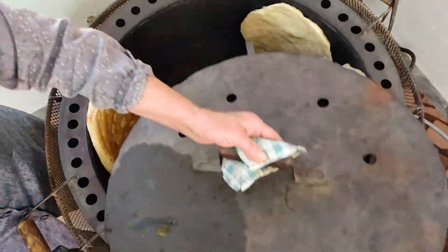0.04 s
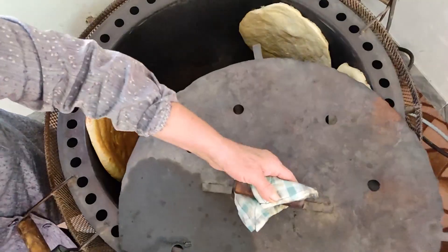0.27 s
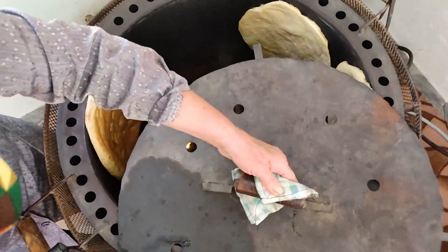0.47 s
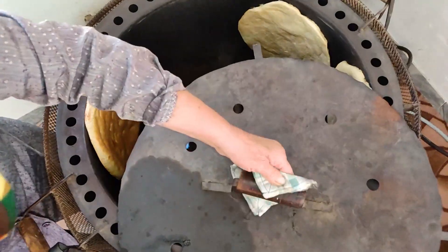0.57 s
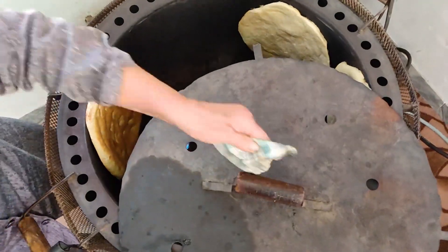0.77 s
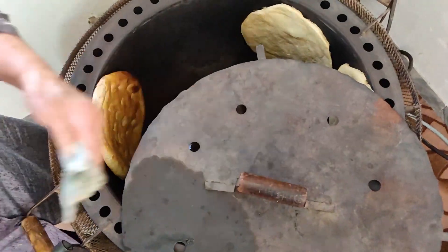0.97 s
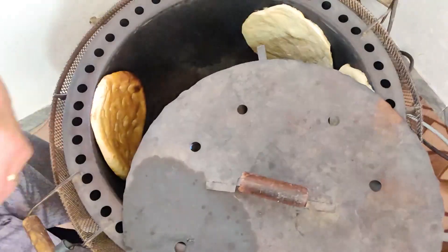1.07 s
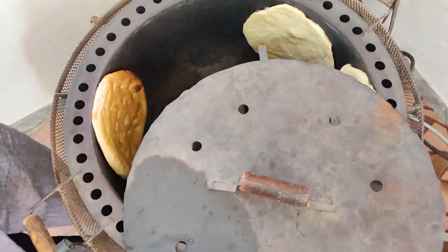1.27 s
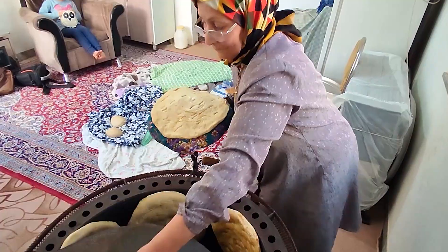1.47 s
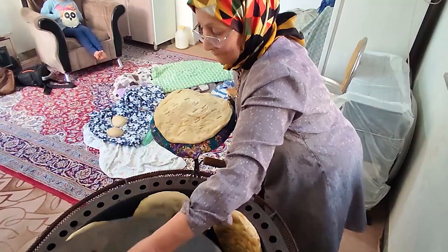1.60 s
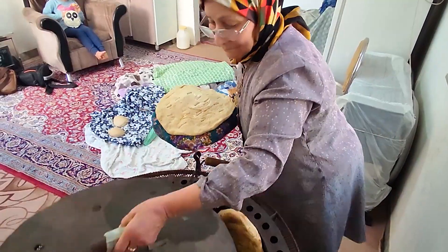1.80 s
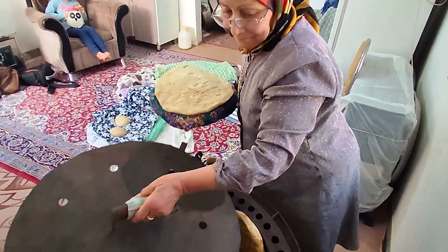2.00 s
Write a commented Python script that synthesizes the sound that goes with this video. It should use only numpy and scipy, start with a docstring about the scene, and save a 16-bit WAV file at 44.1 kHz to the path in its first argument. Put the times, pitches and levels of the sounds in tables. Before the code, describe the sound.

A heavy metal lid clanks down on a hollow drum oven close by, ringing and rocking to rest. Then, heard from farther back in the room, it scrapes off over the rim. A gas burner hisses throughout.

```python
"""A heavy sheet-metal lid is set on a drum oven, close to a stereo microphone.
It lands with a click and a short low tone, clanks and groans over the rim, and rocks to rest. The
clanks ring the lid's modes, the hollow drum booms under the weight, and a gas burner hisses throughout.
From 1.4 s the microphone is mono and farther back in the room: the lid is dragged off again,
scraping over the rim while the hand damps its ring."""
import sys
import numpy as np
from scipy import signal
from scipy.io import wavfile
from scipy.ndimage import uniform_filter1d

SR = 44100
rng = np.random.default_rng(int(sys.argv[2]) if len(sys.argv) > 2 else 0)


def to_wav(sig):
    """Store sig (one row per channel, or 1-D mono) as 16-bit WAV at the path in sys.argv[1].

    Samples outside -1..1 are clipped; the rate is SR.
    """
    pcm = np.clip(np.atleast_2d(sig), -1, 1) * 32767
    pcm = np.round(pcm).astype(np.int16)
    wavfile.write(sys.argv[1], SR, pcm.T)  # frames by channels


N = 90404
T = np.arange(N) / SR

# the lid's clearest modes: f/Hz, relative level/dB
LID_MODES = [(181, 1), (356, 6), (402, 3), (577, 5.5), (597, 1), (648, 3), (708, 2.5), (850, -1),
             (914, 2.5), (1016, -1.5), (1048, 0.5), (1497, -9), (1835, -8)]


def amp(db):
    """Decibels to gain."""
    return 10 ** (np.asarray(db) / 20)


def unit(x):
    """Scales to rms 1."""
    return x / np.sqrt(np.mean(x ** 2) + 1e-20)


def read(points, hz):
    """Reads a table on a log-frequency axis."""
    f, value = np.transpose(points)
    return np.interp(np.log(hz + 1), np.log(f + 1), value)


def colour(x, db_at, size=4096):
    """Causal filter whose gain in dB is a function of frequency."""
    log_gain = np.log(amp(db_at(abs(np.fft.fftfreq(size, 1 / SR)))))
    taps = np.fft.ifft(np.exp(np.conj(signal.hilbert(log_gain)))).real[:size // 2]
    return signal.fftconvolve(x, taps)[:N]


def wander(hz):
    """Random motion of rms 1, low-passed at hz."""
    return unit(signal.sosfilt(signal.butter(2, hz, fs=SR, output="sos"), rng.standard_normal(N)))


def stereo_noise(likeness, db_at):
    """Two partly alike noises, shaped in dB over frequency and time."""
    frames = dict(fs=SR, nperseg=512, noverlap=384)
    hz, t, (left, other) = signal.stft(rng.standard_normal((2, N)), **frames)
    alike = np.clip(read(likeness, hz), -1, 1)[:, None]
    right = alike * left + np.sqrt(1 - alike ** 2) * other
    return signal.istft(np.array([left, right]) * amp(db_at(hz, t)), **frames)[1][:, :N]


def place(pair, balance):
    """Leans each band to the left or right of the microphone."""
    return np.array([colour(x, lambda hz: side * read(balance, hz)) for x, side in zip(pair, (.5, -.5))])


def burner(spectrum, db, flutter_db=1.5):
    """Steady gas hiss and low flame rumble with a slight flutter."""
    # the hiss across the stereo pair: f/Hz, likeness of left and right
    likeness = [(150, 0.76), (1200, 0.11), (8000, -0.032)]

    def flutter(hz, t):
        patches = uniform_filter1d(rng.standard_normal((len(hz), len(t))), size=10, axis=0)
        return flutter_db * unit(uniform_filter1d(patches, size=16, axis=1))

    hiss = [colour(x, lambda hz: read(spectrum, hz)) for x in stereo_noise(likeness, flutter)]
    return amp(db) * unit(np.array(hiss))


def tick(start, db, decay, low_hz, high_hz):
    """A sharp, bright click of metal on metal: a short burst of band-limited noise."""
    band = signal.butter(4, [low_hz, high_hz], "band", fs=SR, output="sos")
    burst = unit(signal.sosfilt(band, rng.standard_normal((2, N))))
    return amp(db) * burst * (T >= start) * np.exp(-np.maximum(T - start, 0) / decay)


def rim_tone(start, rise, length, pitch_hz, wobble_hz, db):
    """A short wavering tone: the first clank's low ring, or later a groan of the edge on the rim."""
    age = np.maximum(T - start, 0)
    drift, flicker = wander(hz=45.3), wander(hz=45.3)
    tone = np.sin(2 * np.pi * np.cumsum(pitch_hz + wobble_hz * drift) / SR) * (1 + 0.26 * flicker)
    return amp(db) * tone * np.minimum(age / rise, 1) * np.exp(-(age / length) ** 4)


def impacts(per_s, spread_db=5):
    """Random small impacts of uneven size, metal on metal."""
    size = amp(spread_db * np.minimum(rng.exponential(1, N), 3)) * rng.choice([-1, 1], N)
    return unit(size * (rng.random(N) < per_s / SR))


def clank(start, db, length, bass_db, treble_db, blow, bass_hz=350, treble_hz=2290):
    """Force of one contact: a blow, then chatter as the edge grinds along the rim."""
    def shelves(hz):
        return bass_db / (1 + (hz / bass_hz) ** 2) + treble_db * hz ** 2 / (hz ** 2 + treble_hz ** 2)

    age = np.maximum(T - start, 0)
    chatter = impacts(per_s=900) * (T >= start) * np.exp(-(age / length) ** 2)
    chatter /= np.linalg.norm(chatter) + 1e-9
    low_cut = signal.butter(2, 298, "high", fs=SR)  # the small impacts carry little bass
    force = signal.lfilter(*low_cut, chatter + 1e-15)
    force[round(start * SR)] += blow
    return amp(db) * colour(force, shelves)


def clanking(uneven_db=6, cluster_hz=76.02):
    """Force of the run of clanks, exciting some clusters of upper modes more than others."""
    # lid meets rim: t/s, level/dB, chatter length/s, bass/dB, treble/dB, strength of the blow
    contacts = [(.1993, -3.5, 0.052, -12.5, 4, 0.68), (.275, -9, 0.026, -2.5, 9, 0.98),
                (.315, -6, 0.11, 9, -5.5, 0.77), (.406, 0.5, 0.035, 4.5, -4.5, 0.38),
                (.4597, 3, 0.073, 1, 0, 1), (.52, -12, 0.11, 10, -18, 0.9), (.56, -9, 0.014, -3, 7.5, 0.69),
                (.817, -23, 0.053, -16, 5, 0.27), (1.575, -13.5, 0.0041, -27, -12, 0.93)]
    grid = np.arange(0, SR / 2, cluster_hz)
    top_mode_hz = LID_MODES[-1][0]
    clusters_db = uneven_db * rng.uniform(-0.99, 1, len(grid)) * (grid > top_mode_hz)
    return colour(sum(clank(*row) for row in contacts), lambda hz: np.interp(hz, grid, clusters_db))


def mode_crowd(ring_share, db=-24.5):
    """The lid's answer to one tap: a dense crowd of weaker modes that dies sooner in the treble."""
    # spectrum of the crowd: f/Hz, relative level/dB
    spectrum = [(40, -2.5), (130, 2.5), (190, 11.5), (450, 9), (1050, 6.5), (1400, 2.5), (2800, -2.5),
                (4500, -6.5), (6200, -6), (7500, 2), (8700, -7), (10000, -19.5), (15000, -29.5)]
    # ring time of the free lid: f/Hz, t60/s
    ring_times = [(60, 0.6), (250, 0.67), (1200, 0.72), (3000, 0.47), (7500, 0.27), (14000, 0.097)]
    # the ring across the stereo pair: f/Hz, likeness of left and right (1 and above: identical)
    likeness = [(200, 1.3), (650, 0.4), (1400, -0.04), (8000, -0.02)]

    def decay_db(hz, t):
        return -60 * t / np.maximum(ring_share * read(ring_times, hz), .02)[:, None]

    crowd = stereo_noise(likeness, decay_db)
    return amp(db) * np.array([colour(x, lambda hz: read(spectrum, hz)) for x in crowd])


def clear_mode(force, hz, t60, reach_hz=260, beat_depth=0.38, beat_hz=15.5):
    """One mode stores the energy of impacts near its pitch and lets it go, beating as the lid tilts."""
    carrier = np.exp(2j * np.pi * hz * T)
    pole = np.exp(-np.pi * reach_hz / SR)
    power = abs(signal.lfilter([np.sqrt(1 - pole ** 2)], [1, -pole], force / carrier + 1e-15)) ** 2
    energy = signal.lfilter([1], [1, -amp(-60 / (t60 * SR)) ** 2], power)
    phase = np.exp(2j * np.pi * rng.random())
    beating = beat_depth * (wander(beat_hz) + 1j * wander(beat_hz))
    return np.sqrt(energy) * (carrier * (phase + beating)).real


def lid(force, modes_db, ring_share=1, free_t60_s=0.47, roll_hz=2.227):
    """The lid rings: clear modes over a crowd that shifts as the contact wanders round the rim."""
    weights = [np.sqrt(2 / 3) * np.cos(2 * np.pi * roll_hz * T + np.pi * k / 3) for k in range(3)]
    crowd = sum(signal.fftconvolve((force * weight)[None], mode_crowd(ring_share), axes=1)[:, :N]
                for weight in weights)
    t60 = ring_share * free_t60_s
    return crowd + sum(amp(modes_db + db) * clear_mode(force, hz, t60) for hz, db in LID_MODES)


def drum_boom(start=0.392, rise_s=0.03, decay_s=0.096, db=-32):
    """The hollow drum rumbles as it takes the lid's weight."""
    age = np.maximum(T - start, 0)
    return amp(db) * wander(hz=154) * np.minimum(age / rise_s, 1) * np.exp(-age / decay_s)


def rubbing(pressure, db, per_s):
    """Force of a lasting contact: a stream of impacts that follows the pressure."""
    times, levels = np.transpose(pressure)
    return impacts(per_s) * amp(db + np.interp(T, times, levels)) * (T >= times[0])


def rocking():
    """Force of the lid rocking to rest: a soft contact that swells and fades."""
    # pressure on the rim: t/s, relative level/dB
    pressure = [(.58, -3), (.64, -8.5), (.71, -10), (.76, -3.5), (.87, -7.5), (.93, -14), (1.05, -43),
                (1.2, -29)]
    # colour of the soft contact: f/Hz, gain/dB
    tone = [(50, 8.5), (130, -1), (210, 5), (400, 2.5), (700, 0.5), (1100, -0.5), (2000, 1), (4000, -20),
            (8000, -12.5)]
    return colour(rubbing(pressure, db=-39.5, per_s=380), lambda hz: read(tone, hz))


def dragging(clanks):
    """Force of the lid dragged over the rim: scrape and clanks take on the same colour."""
    # pressure of the drag: t/s, relative level/dB
    pressure = [(1.39, -5), (1.42, -2.5), (1.445, 1), (1.585, 1), (1.62, -2.5), (1.7, -9.5), (1.78, -11),
                (2.05, -17.5)]
    # colour of the scrape: f/Hz, gain/dB
    tone = [(50, -16), (135, 15), (200, 6.5), (350, 6), (530, -1.5), (750, 1), (1050, 9.5), (1600, 1.5),
            (3600, -10), (4500, 3.5), (5300, -11.5), (8000, -31.5), (10000, -4), (15000, -32)]
    return colour(rubbing(pressure, db=-50.5, per_s=500) + clanks, lambda hz: read(tone, hz))


def scene(far_from_s=1.397, crossfade_s=0.004):
    """The lid is set down close by in stereo, then dragged off in mono from back in the room."""
    # burner and room, close up and from farther back: f/Hz, relative level/dB
    near_hiss = [(25, -1.5), (100, -10), (190, 1), (290, -8), (1200, -14), (2200, -17.5), (4000, -27.5),
                 (7250, -19.5), (7500, -9.5), (7750, -17), (8900, -23.5), (10500, -38), (15000, -54)]
    far_hiss = [(80, -6.5), (130, 4.5), (250, -14.5), (500, -29), (1100, -16.5), (3000, -32.5),
                (4500, -24.5), (5500, -36.5), (7200, -40.5), (9200, -63), (9950, -37), (10800, -54),
                (15000, -68)]
    # clicks of handle and edge, the second as the first clank lands:
    # t/s, level/dB, decay/s, lowest f/Hz, highest f/Hz
    clicks = [(0.054, -50.5, 0.025, 3950, 8900), (0.199, -43, 0.004, 3500, 12900),
              (1.512, -59, 0.035, 4000, 5200), (1.964, -57.5, 0.024, 1520, 4700)]
    # the first clank's short low ring, then five groans of the sliding edge:
    # t/s, rise/s, length/s, f/Hz, wobble/Hz, level/dB
    ring_and_groans = [(0.198, 0.0049, 0.059, 353.2, 5.1, -38), (0.261, 0.024, 0.12, 198, 5.6, -33.5),
                       (0.754, 0.1, 0.14, 210, 5.4, -32.5), (1.068, 0.015, 0.1, 385, 17.3, -49),
                       (1.427, 0.015, 0.12, 372, 6, -39), (1.554, 0.008, 0.036, 1030, 29, -41)]
    # lid and burner at the close microphone: f/Hz, left minus right/dB
    lid_balance = [(700, 4), (2500, 1), (5500, -3), (9000, -0.5)]
    hiss_balance = [(1000, 2.5), (5000, -1.5)]

    clanks = clanking()
    ticks = sum(tick(*row) for row in clicks)
    tones = sum(rim_tone(*row) for row in ring_and_groans)
    set_down = lid(clanks + rocking(), modes_db=-41) + ticks + tones + drum_boom()
    near = place(set_down, lid_balance) + place(burner(near_hiss, db=-49.5), hiss_balance)

    held_lid = lid(dragging(clanks), modes_db=-49.5, ring_share=0.64)  # the hand damps the ring
    far = (held_lid + ticks + tones + burner(far_hiss, db=-54.5))[0]  # one channel: mono
    far_share = np.clip((T - far_from_s) / crossfade_s + .5, 0, 1)
    return near * (1 - far_share) + far * far_share


def record(dry, top_hz=15700):
    """The recorder's band limit."""
    low_pass = signal.firwin(511, top_hz, window=("kaiser", 9), fs=SR)
    return signal.oaconvolve(dry, low_pass[None], "same")


dry = scene()
out = record(dry)
to_wav(out)
```